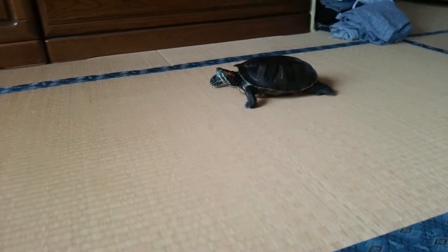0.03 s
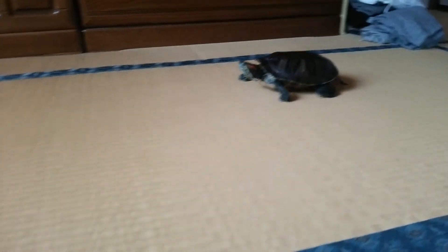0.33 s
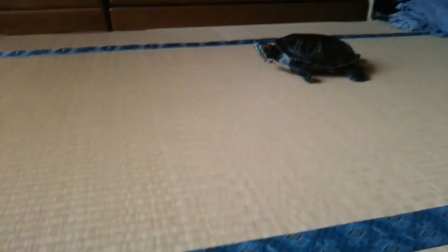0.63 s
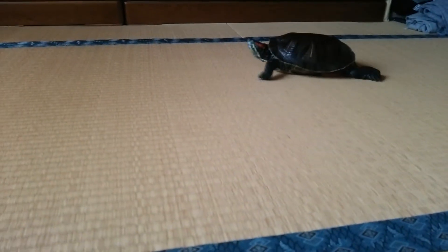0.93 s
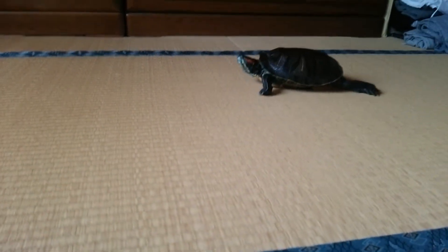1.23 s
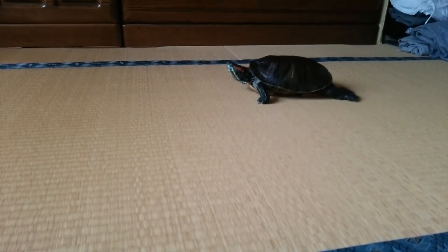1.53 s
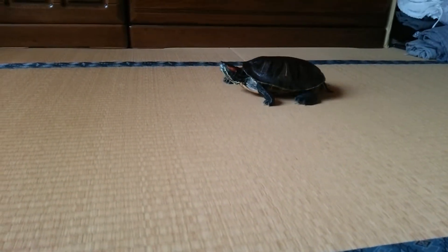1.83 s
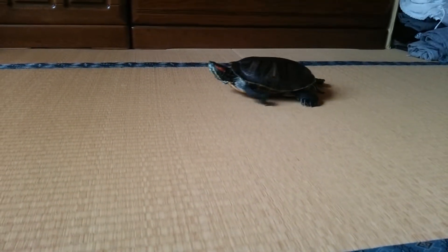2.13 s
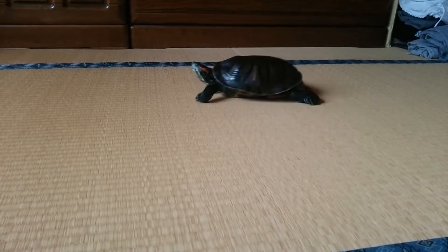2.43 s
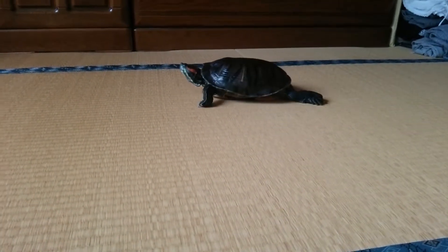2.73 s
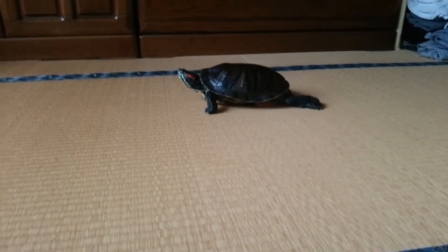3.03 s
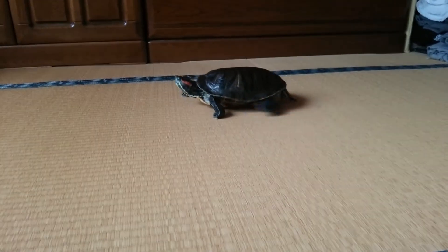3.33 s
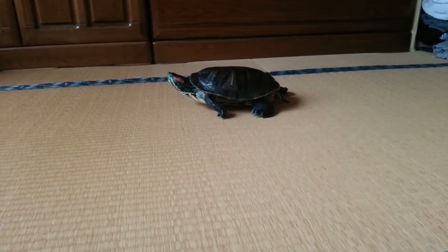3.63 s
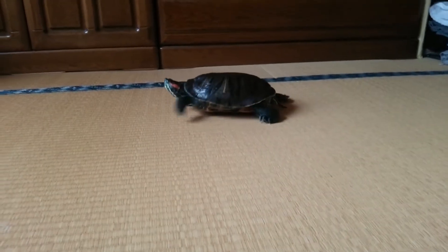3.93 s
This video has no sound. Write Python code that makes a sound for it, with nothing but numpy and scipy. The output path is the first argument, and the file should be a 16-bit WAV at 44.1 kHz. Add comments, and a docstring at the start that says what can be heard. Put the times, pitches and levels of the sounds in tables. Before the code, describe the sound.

A turtle walks over a woven straw mat, its feet scuffing in uneven scratchy strokes with claw ticks and dull shell taps. Low handling thumps come from the microphone's left side, and a faint insect-like trill pulses in the quiet room.

```python
"""A turtle walks over a woven straw mat in a small quiet room. Its feet and shell scuff the weave
in countless tiny slips; its claws tick, zip and sizzle on the straws, and its shell taps dully.
The hand that follows it with a phone rubs, judders and bumps beside the left microphone port.
A faint pulsing trill, probably an insect, comes from the left over the room's hush."""
import sys
import numpy as np
from scipy import signal
from scipy.fft import rfft, irfft
from scipy.io import wavfile
from scipy.ndimage import uniform_filter1d, map_coordinates

SR = 44100
rng = np.random.default_rng(int(sys.argv[2]) if len(sys.argv) > 2 else 0)


def to_wav(sig):
    """Store sig (one row per channel, or 1-D mono) as 16-bit WAV at the path in sys.argv[1].

    Samples outside -1..1 are clipped; the rate is SR.
    """
    pcm = np.clip(np.atleast_2d(sig), -1, 1) * 32767
    pcm = np.round(pcm).astype(np.int16)
    wavfile.write(sys.argv[1], SR, pcm.T)  # frames by channels


N = 176400

# tone of a straw snapping back (frequency [Hz], level [dB])
SNAP_TONE = [(300, -23), (1100, -4), (2400, -23), (4200, 1.5), (4900, 7.5), (5700, -4.5), (7500, -17),
             (10000, -27.5), (15000, -38.5)]
RISE_SHARE = 0.073  # of a stroke's length
COLOUR_WANDER = 0.05  # relative spread of the weave's resonant pitches


def undb(db):
    """Decibels to gain."""
    return 10 ** (np.asarray(db) / 20)


def unit(x):
    """Scale to rms 1."""
    return x / np.sqrt(np.mean(x ** 2))


def fader(rows):
    """Gain along a curve of (time [s], level [dB])."""
    return undb(np.interp(np.arange(N) / SR, *np.array(rows).T))


def colour(x, tone, normalise=True):
    """Minimum-phase EQ through (frequency [Hz], level [dB]) points, by default of unit energy."""
    size = 16384
    hz, db = np.array(tone, float).T
    freqs = np.maximum(np.fft.rfftfreq(size, 1 / SR), 1)
    gain = undb(np.interp(np.log(freqs), np.log(hz), db))
    cepstrum = irfft(np.log(gain))
    cepstrum[1:size // 2] *= 2
    cepstrum[size // 2 + 1:] = 0
    impulse = irfft(np.exp(rfft(cepstrum)))[:size // 2]
    return signal.fftconvolve(x, impulse / np.linalg.norm(impulse) if normalise else impulse)[:N]


def wobble(rate_hz):
    """Smooth random modulation of rms 1."""
    hold = max(int(SR / rate_hz), 1)
    steps = np.repeat(rng.standard_normal(N // hold + 1), hold)
    return unit(uniform_filter1d(steps, hold)[:N])


def strikes(rows):
    """One impulse for each (time [s], level [dB])."""
    out = np.zeros(N)
    for time, db in rows:
        out[int(np.clip(time * SR, 0, N - 1))] += undb(db)
    return out


def swell(start, rise, length, release_s=0.027):
    """Envelope of a stroke: it rises, holds and dies away."""
    t = np.arange(N) / SR - start
    return np.clip(t / max(rise, 1 / SR), 0, 1) * np.exp(-np.maximum(t - length, 0) / release_s)


def grains(per_s=2400, spread_db=3.5):
    """Countless tiny slips over the straw, of uneven size."""
    size = undb(spread_db * np.minimum(rng.exponential(size=N), 4))
    return unit((rng.random(N) < per_s / SR) * size * rng.choice([-1, 1], N))


def rasp(tone, likeness=0.2):
    """Slips ring the weave, whose colour wanders under the foot; each port hears partly other straws."""
    shared = np.sqrt(likeness) * grains()
    playhead = np.cumsum(1 + COLOUR_WANDER * wobble(14))
    ports = [colour(shared + np.sqrt(1 - likeness) * grains(), tone) for _ in range(2)]
    return np.array([map_coordinates(port, [playhead], order=3, mode="mirror") for port in ports])


def snaps(per_s=45, level_db=-6):
    """Sparse snaps of single straws make a scuff scratchy."""
    clicks = (rng.random(N) < per_s / SR) * rng.uniform(0.47, 1, (2, N))
    return undb(level_db) * unit(np.array([colour(port, SNAP_TONE) for port in clicks]))


def scuffs(hiss_trim_db=-2, body_trim_db=0.5):
    """Feet push off and legs trail, stirring the hiss of the straw and the body of the mat."""
    # feet pushing off (start [s], length [s], hiss [dB], body [dB])
    pushes = [(0.0, 0.14, -50, -57), (0.214, 0.14, -52, -49.5), (0.399, 0.055, -51, -58),
              (0.471, 0.02, -43.5, -52), (0.678, 0.0085, -54.5, -57), (0.743, 0.02, -47.5, -51.5),
              (0.815, 0.042, -48, -51), (0.872, 0.016, -37.5, -47), (0.909, 0.087, -42.5, -55),
              (1.021, 0.053, -42, -44.5), (1.091, 0.023, -40, -45.5), (1.141, 0.048, -47.5, -52.5),
              (1.332, 0.015, -51, -57), (1.44, 0.048, -53, -58.5), (1.52, 0.16, -49, -59.5),
              (1.815, 0.11, -46, -48.5), (1.854, 0.045, -47, -63), (1.941, .13, -52.5, -56),
              (2.223, 0.025, -53.5, -56.5), (2.413, 0.032, -34.5, -41), (2.472, 0.072, -44, -49.5),
              (2.57, 0.059, -48.5, -47), (2.673, 0.025, -46, -56), (2.736, 0.022, -41.5, -49),
              (3.327, 0.0096, -50, -49), (3.426, 0.019, -36, -47.5), (3.469, 0.041, -52.5, -50.5),
              (3.55, 0.087, -56, -61)]
    # swishes of a trailing leg (start [s], rise [s], length [s], hiss [dB], body [dB])
    drags = [(.15, 0.029, 0.17, -41, -64), (1.68, 0.045, 0.083, -38.5, -48.5),
             (2.35, .02, 0.03, -39.5, -44), (2.99, 0.28, .2, -48.5, -55.5),
             (3.175, 0.065, 0.11, -40.5, -61.5), (3.83, 0.025, 0.025, -63, -78)]
    # bright hiss of the straw (frequency [Hz], level [dB])
    straw_tone = [(600, -30.5), (2000, -12.5), (3300, -5), (4200, 1.5), (5000, 0), (5800, -6),
                  (7300, -11.5), (9000, -21.5), (15500, -33.5)]
    # midrange body of the mat (frequency [Hz], level [dB])
    mat_tone = [(150, -14.5), (500, -23), (750, -3), (1000, 3.5), (1650, -8), (2200, -7.5), (3200, -13.5),
                (10000, -45.5)]
    strokes = [(start, RISE_SHARE * length, length, *levels) for start, length, *levels in pushes]
    hiss_power, body_power = np.zeros(N), np.zeros(N)
    for start, rise, length, hiss_db, body_db in strokes + list(drags):
        envelope = swell(start, rise, length)
        hiss_power += (envelope * undb(hiss_db)) ** 2
        body_power += (envelope * undb(body_db)) ** 2
    hiss = np.sqrt(hiss_power) * (rasp(straw_tone) + snaps())
    body = np.sqrt(body_power) * rasp(mat_tone)
    return undb(hiss_trim_db) * hiss + undb(body_trim_db) * body


def hand(thump_trim_db=18.5, right_leak_db=-26):
    """The grip on the phone sways, rubs, judders and bumps, nearly all in the left port."""
    # single shifts of the grip (time [s], thump [dB], creak [dB])
    bumps = [(.36, -22, -22), (.876, -9.5, -4), (.984, -7.5, -5.5), (1.447, 0, -16), (1.476, -1, -18),
             (1.553, 1.5, -27), (1.608, -2.5, -25), (1.694, -0.5, -23), (1.753, -1, -27),
             (1.798, -3.5, -23), (1.882, -6.5, -13), (2.13, -14, -17), (2.24, -16, -26), (2.895, -11, -30),
             (3.65, -39, -17.5), (3.92, 0.5, -11), (3.95, -11.5, -20)]
    # skin sticking and slipping (start [s], end [s], rate [slips/s], thump [dB], creak [dB])
    judders = [(0.025, 0.147, 31.3, -14.5, -8), (0.658, 0.848, 34, -16.5, -19.5),
               (1.088, 1.347, 27, -5, -30), (2.994, 3.19, 23.1, -13.5, -18)]
    # swells of the slow sway and of a finger rubbing by the port (time [s], level [dB])
    sway_curve = [(0, -12.5), (.6, -18), (.9, -11.5), (1.1, -25.5), (1.42, -11.5), (2.0, -25.5),
                  (2.85, -32), (3.12, -14), (3.35, -35), (4, -20.5)]
    rub_curve = [(0, -43.5), (.8, -54.5), (1.0, -42.5), (1.2, -40.5), (1.43, -33.5), (1.5, -49.5),
                 (1.8, -54), (1.87, -35.5), (1.98, -59), (3.1, -53), (4, -51)]
    # deep thump, low creak, sway rumble and muffled rub (frequency [Hz], level [dB])
    thump_tone = [(10, -17.5), (35, 5.5), (100, -6.5), (160, -20.5), (250, -48), (4000, -130)]
    creak_tone = [(30, -19), (120, 1.5), (450, -8), (700, -22), (1500, -63), (9000, -100)]
    sway_tone = [(8, 2), (35, -11), (100, -27.5), (200, -55.5), (2000, -100)]
    rub_tone = [(50, 5.5), (140, 1.5), (260, -8), (700, -10.5), (1000, -21.5), (5000, -49.5)]
    slips = list(bumps)
    for start, end, rate, thump_db, creak_db in judders:
        jitter = rng.standard_normal((32, 2)) * [0.097, 2]  # timing [periods], level [dB]
        for time, (late, accent_db) in zip(np.arange(start, end, 1 / rate), jitter):
            slips.append((time + late / rate, thump_db + accent_db, creak_db + accent_db))
    slips = np.array(slips)
    thumps = undb(thump_trim_db) * colour(strikes(slips[:, [0, 1]]), thump_tone)
    creaks = colour(strikes(slips[:, [0, 2]]), creak_tone)
    rub = fader(rub_curve) * colour(rng.standard_normal(N), rub_tone)
    sway = [fader(sway_curve) * unit(colour(rng.standard_normal(N), sway_tone)) for _ in range(2)]
    left = thumps + creaks + rub + sway[0]
    right = undb(right_leak_db) * (creaks + rub + sway[1])
    return np.array([left, right])


def hush(level_db=-53):
    """The steady air of the room, duller on the left."""
    # room tone (frequency [Hz], level [dB])
    air_tone = [(25, 1.5), (100, -7.5), (200, -16.5), (800, -21.5), (1500, -26), (3000, -21.5), (5000, -26),
                (8000, -33.5), (15000, -50.5)]
    out = []
    for side in (1, -1):
        air = undb(level_db) * colour(rng.standard_normal(N), air_tone)
        out.append(colour(air, [(3500, 1.74 * side), (7500, -3 * side)], normalise=False))
    return np.array(out)


def trill(pitch_hz=2977, waver_hz=58, flutter_db=4.3, pip_s=0.051):
    """Soft pips of one slightly rough note, probably an insect, on the left."""
    # runs of even pips (start [s], end [s], rate [pips/s], level [dB])
    runs = [(0.018, .9, 10, -54.5), (1.716, 2, 8, -54.5), (2.04, 3.03, 12.5, -55),
            (3.092, 3.95, 9.9, -54.5)]
    t = np.arange(N) / SR
    pips = np.zeros(N)
    for start, end, rate, db in runs:
        for centre in np.arange(start, end, 1 / rate):
            pips += undb(db) * np.sqrt(np.maximum(1 - (2 * (t - centre) / pip_s) ** 2, 0))
    hz = pitch_hz + waver_hz * wobble(400)
    note = np.sin(2 * np.pi * np.cumsum(hz) / SR) * undb(flutter_db * wobble(150))
    pan = undb([[-2], [-15]])
    return unit(note) * pips * pan


def zips(width_hz=670, rise_s=0.056):
    """Quick slips ring one narrow straw resonance while a claw is dragged."""
    # claw drags (start [s], length [s], pitch [Hz], level [dB])
    drags = [(0.132, 0.17, 5130, -42.5), (1.97, 0.073, 4360, -44), (3.225, 0.036, 4630, -43)]
    out = np.zeros((2, N))
    for start, length, hz, db in drags:
        band = signal.butter(2, [hz - width_hz / 2, hz + width_hz / 2], "bandpass", fs=SR, output="sos")
        ring = unit(signal.sosfilt(band, [grains(), grains()]))
        out += undb(db) * swell(start, rise_s, length) * ring
    return out


def ticks(hits, tone, early_s=0.003, early_db=2):
    """Small impacts, each with its own pitch and a brief scatter of early reflections."""
    t = np.arange(SR // 20) / SR
    out = np.zeros((2, N + 2 * len(t)))
    for time, db in hits:
        detune = np.exp(COLOUR_WANDER * rng.standard_normal())
        hit_tone = [(hz * detune, level) for hz, level in tone]
        at = int(max(time, 0) * SR)
        for port in out:
            burst = rng.standard_normal(len(t)) * np.exp(-t / early_s)
            burst *= undb(early_db) / np.linalg.norm(burst)
            burst[0] += 1  # the direct click
            port[at:at + len(t)] += undb(db) * colour(burst / np.linalg.norm(burst), hit_tone)[:len(t)]
    return out[:, :N]


def claw_ticks(trim_db=-6.5):
    """A claw catches a straw and lets it go with a bright tick."""
    # straws let go (time [s], level [dB])
    hits = [(.313, -6), (.428, -19), (.754, -18.5), (1.11, -10), (1.545, -19), (1.747, -4.5), (1.764, -14),
            (1.861, -1.5), (1.876, -11), (2.133, -13.5), (2.214, -11), (2.245, -15), (2.449, -2.5),
            (2.5685, 2.5), (3.4505, -4), (3.503, -6.5), (3.808, -16.5), (3.836, -17.5), (3.864, -10),
            (3.879, -17.5), (3.907, -23)]
    return undb(trim_db) * ticks(hits, SNAP_TONE)


def shell_taps(trim_db=-12):
    """The shell knocks dully on the mat."""
    # knocks (time [s], level [dB])
    hits = [(.822, -6), (.834, -15), (1.188, -3), (3.463, -4.5)]
    # tone of shell on mat (frequency [Hz], level [dB])
    knock_tone = [(200, -10), (700, -8), (1100, 9.5), (2200, -7), (10000, -50)]
    return undb(trim_db) * ticks(hits, knock_tone)


def sizzle(low_cut_hz=10500):
    """Skating claw tips make the finest slips, an airy band above the straw's resonance."""
    # skids (start [s], length [s], level [dB])
    skids = [(.876, 0.15, -57), (1.56, .2, -68), (2.42, .08, -59)]
    highpass = signal.butter(2, low_cut_hz, "highpass", fs=SR, output="sos")
    envelope = sum(undb(db) * swell(start, RISE_SHARE * length, length) for start, length, db in skids)
    return envelope * signal.sosfilt(highpass, [grains(), grains()])


def turtle(catch_hz=129.4, catch_db=2.5):
    """The sliding sounds flutter as they catch on the weave; ticks and taps sit on top."""
    catch = unit(undb(catch_db * wobble(catch_hz)))
    return catch * (scuffs() + zips() + sizzle()) + claw_ticks() + shell_taps()


def room(ports, t60_s=0.28, tail_db=-3):
    """Direct sound and a short reverb tail, coloured differently at each port."""
    # left port relative to right (frequency [Hz], level [dB])
    balance = [(200, -17), (600, 1.5), (900, 7), (1250, -2.5), (1700, -14.5), (2400, -9.5), (3800, -5),
               (4700, -3), (5700, 3), (7500, -5), (12000, 3)]
    t = np.arange(SR // 2) / SR
    out = []
    for port, side in zip(ports, (1, -1)):
        tail = rng.standard_normal(len(t)) * undb(-60 * t / t60_s)
        impulse = undb(tail_db) * tail / np.linalg.norm(tail)
        impulse[0] += 1  # the direct path
        wet = signal.fftconvolve(port, impulse / np.linalg.norm(impulse))[:N]
        out.append(colour(wet, [(hz, side * db / 2) for hz, db in balance], normalise=False))
    return np.array(out)


def scene():
    """Turtle in the room, hand on the phone, trill and hush."""
    return room(turtle()) + hand() + trill() + hush()


def record(dry, high_cut_hz=15500):
    """The phone cuts the top steeply."""
    return signal.sosfilt(signal.ellip(8, .2, 70, high_cut_hz, fs=SR, output="sos"), dry)


dry = scene()
out = record(dry)
to_wav(out)
```